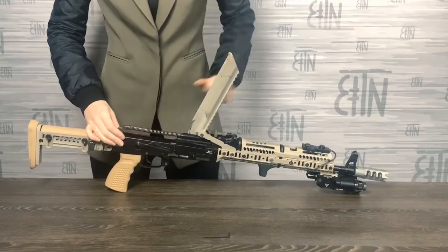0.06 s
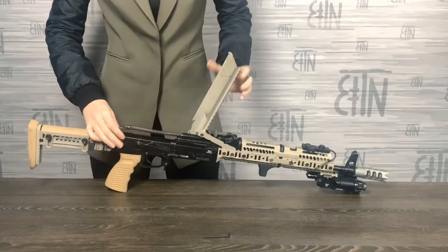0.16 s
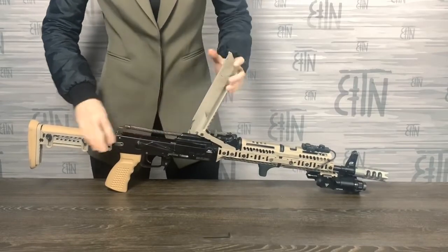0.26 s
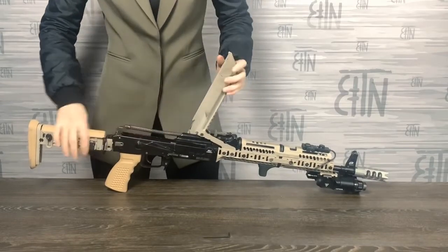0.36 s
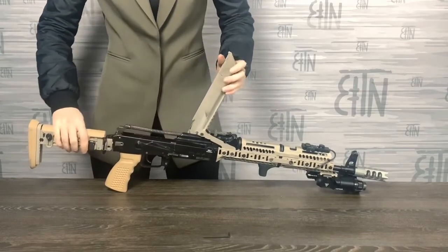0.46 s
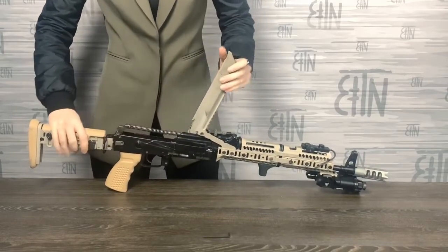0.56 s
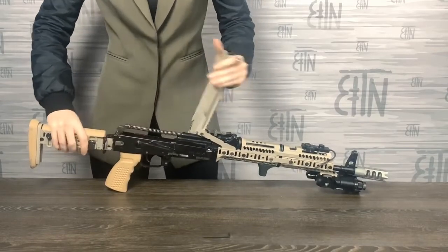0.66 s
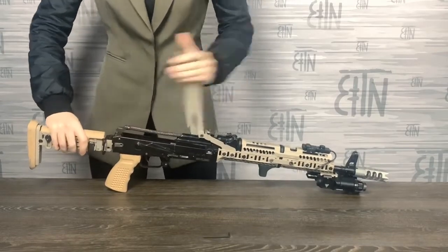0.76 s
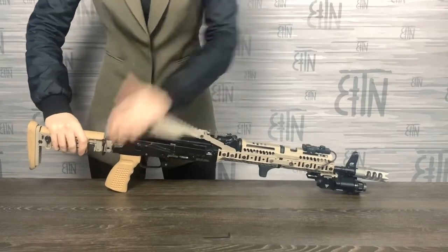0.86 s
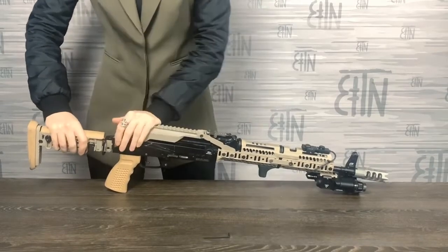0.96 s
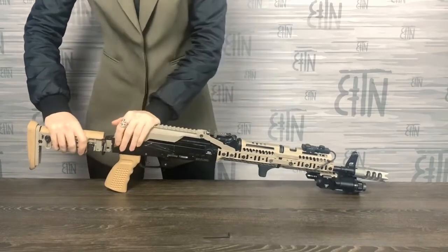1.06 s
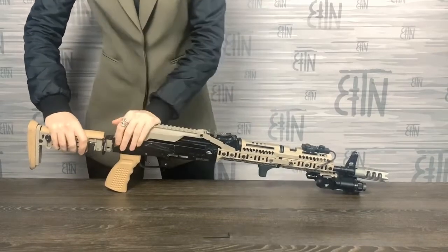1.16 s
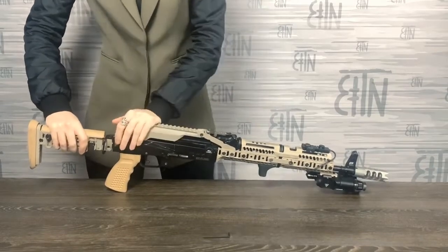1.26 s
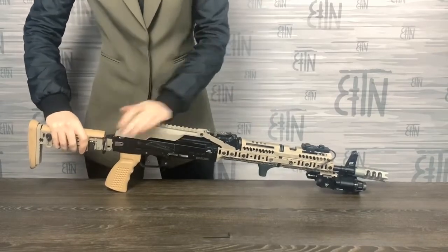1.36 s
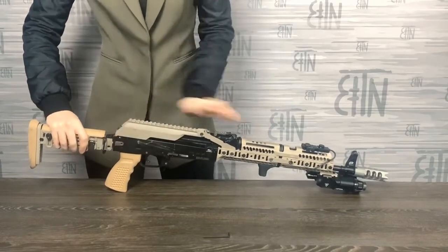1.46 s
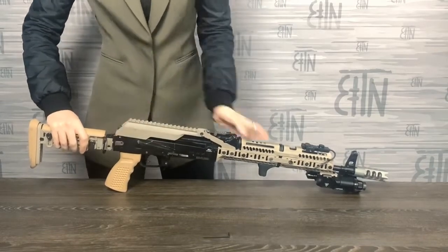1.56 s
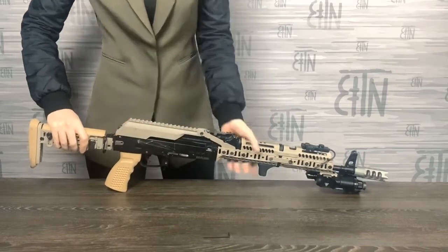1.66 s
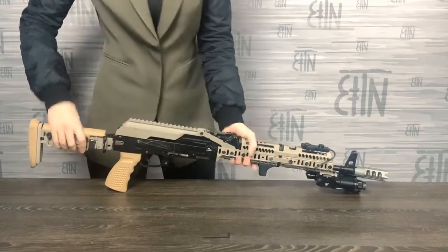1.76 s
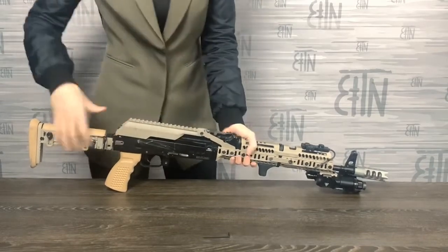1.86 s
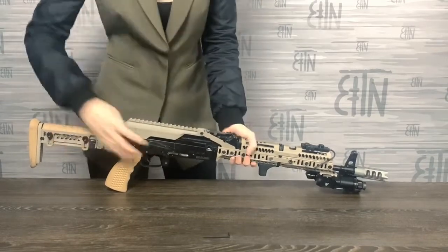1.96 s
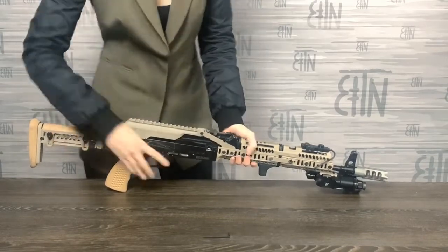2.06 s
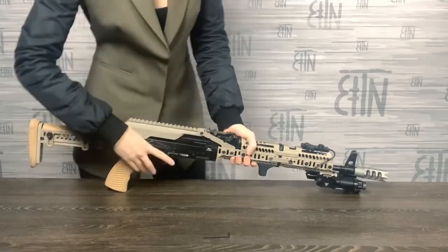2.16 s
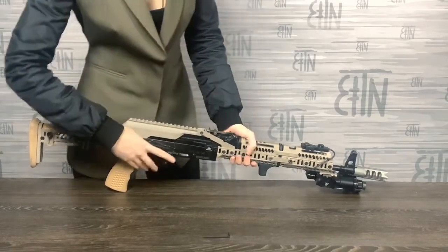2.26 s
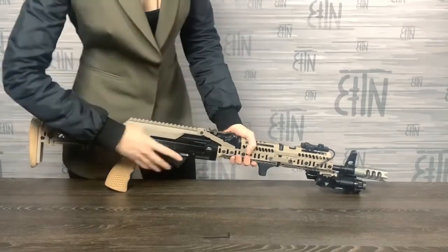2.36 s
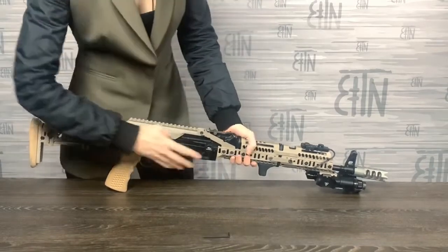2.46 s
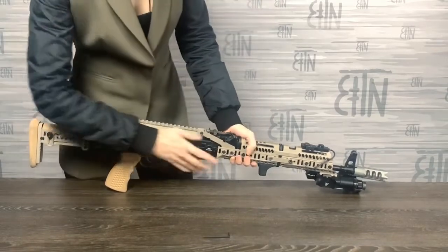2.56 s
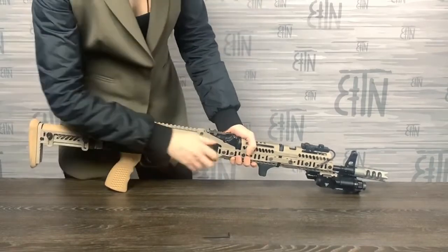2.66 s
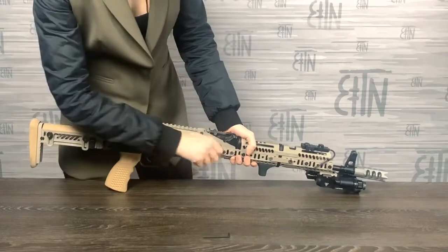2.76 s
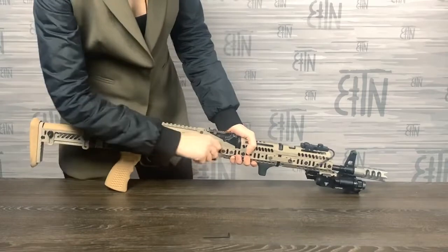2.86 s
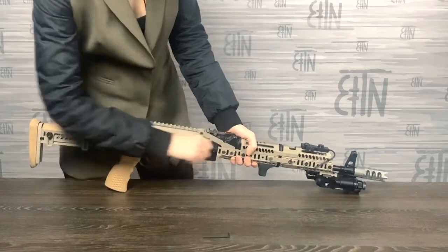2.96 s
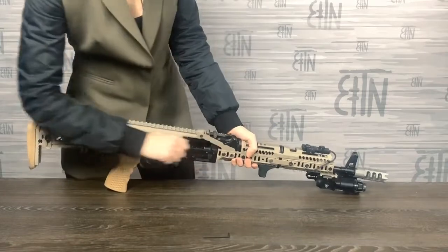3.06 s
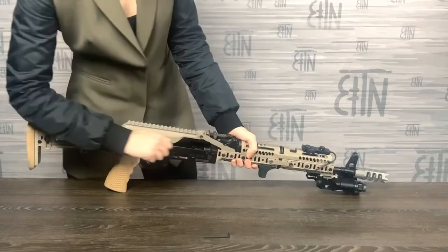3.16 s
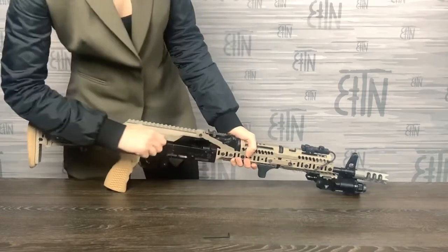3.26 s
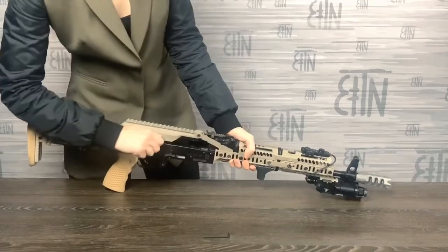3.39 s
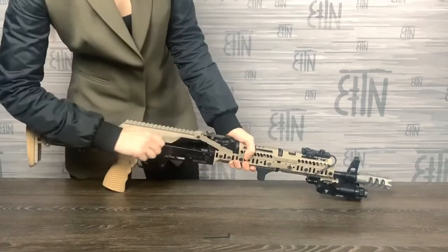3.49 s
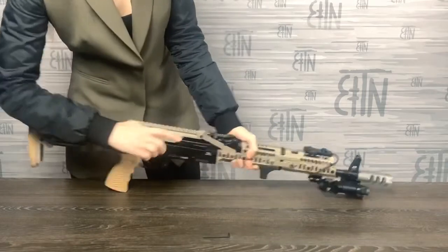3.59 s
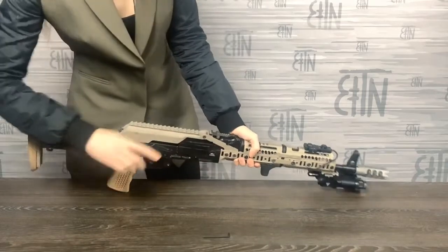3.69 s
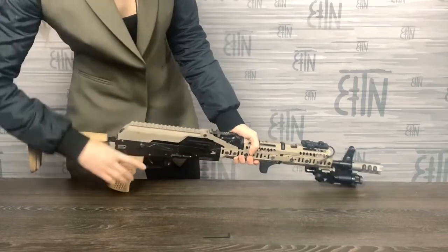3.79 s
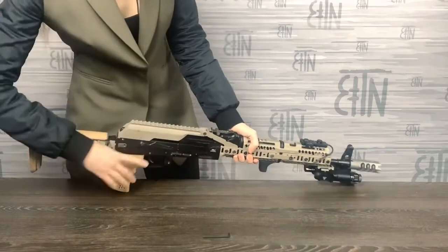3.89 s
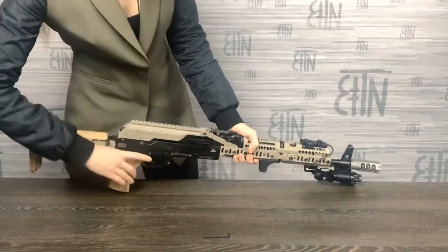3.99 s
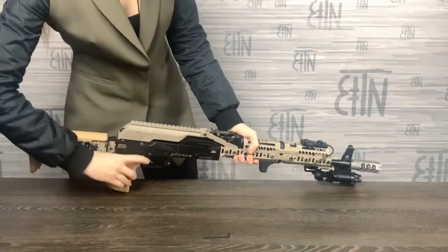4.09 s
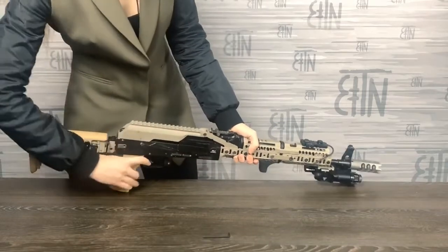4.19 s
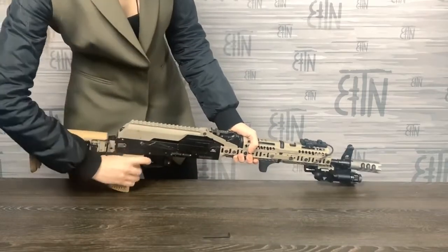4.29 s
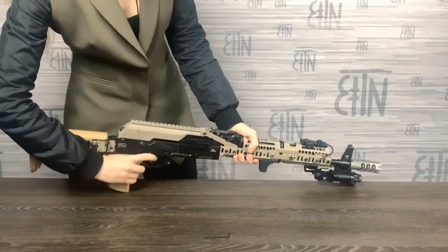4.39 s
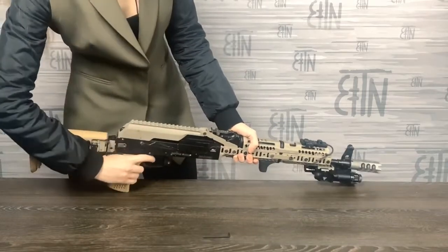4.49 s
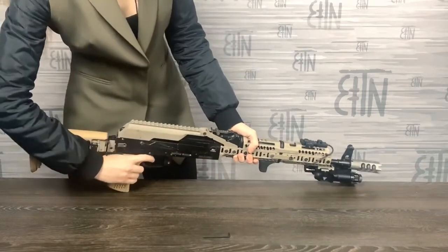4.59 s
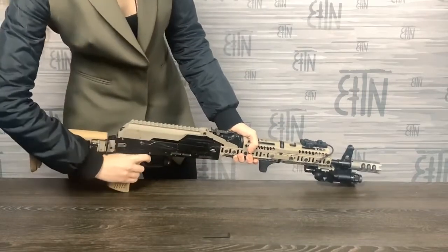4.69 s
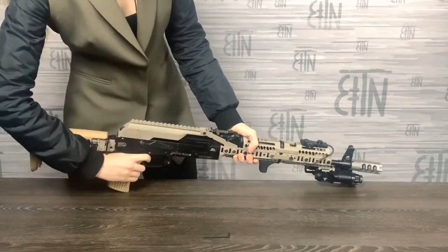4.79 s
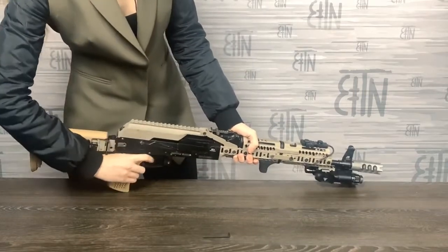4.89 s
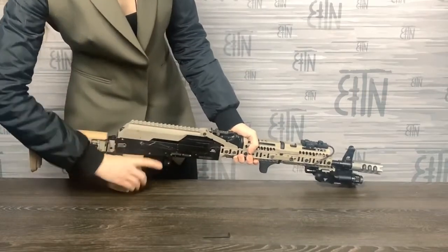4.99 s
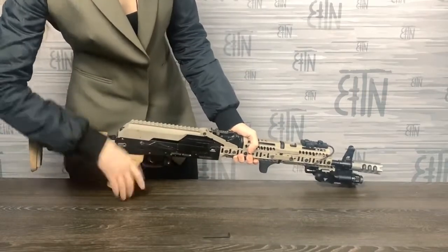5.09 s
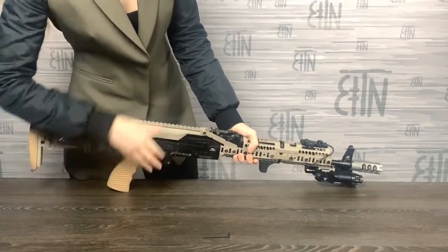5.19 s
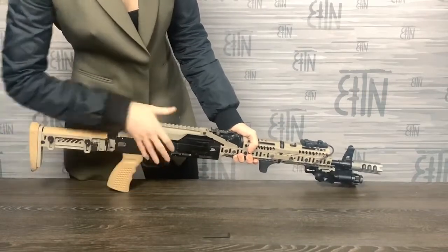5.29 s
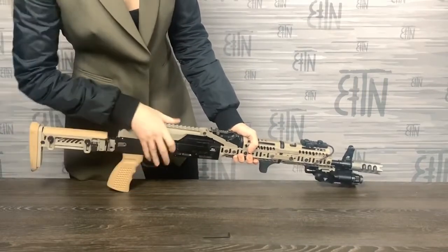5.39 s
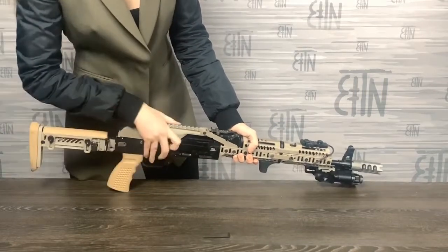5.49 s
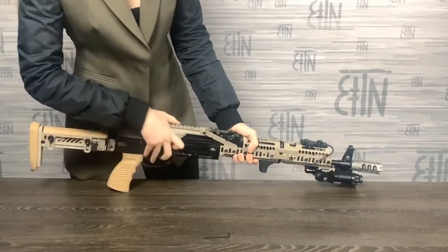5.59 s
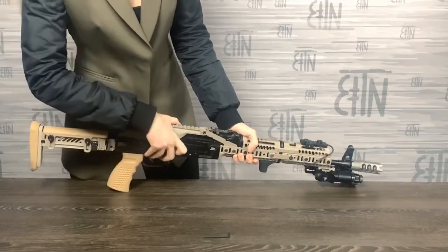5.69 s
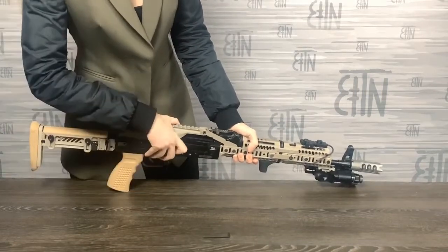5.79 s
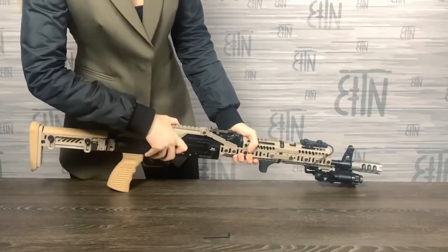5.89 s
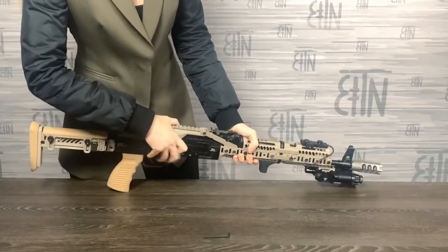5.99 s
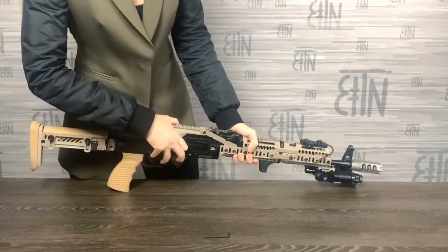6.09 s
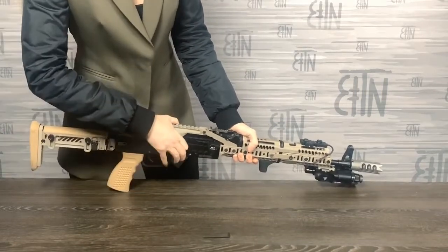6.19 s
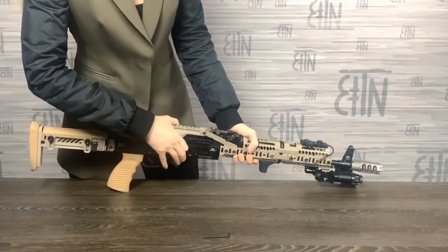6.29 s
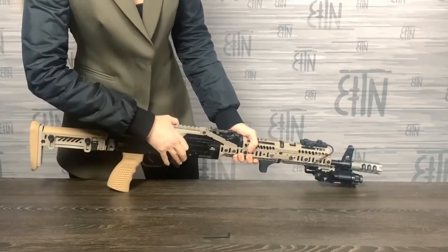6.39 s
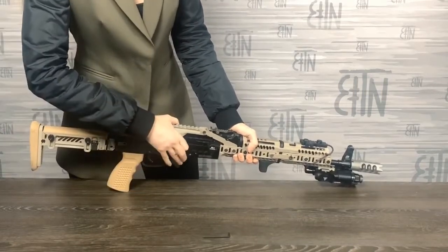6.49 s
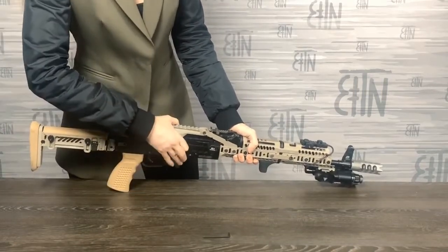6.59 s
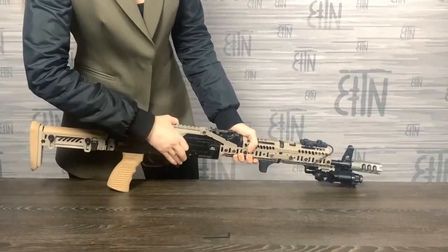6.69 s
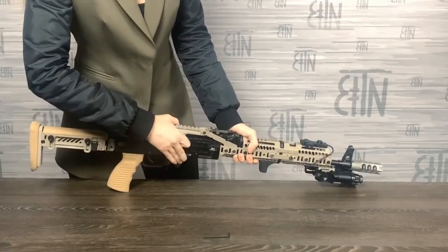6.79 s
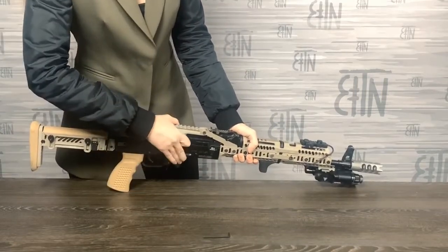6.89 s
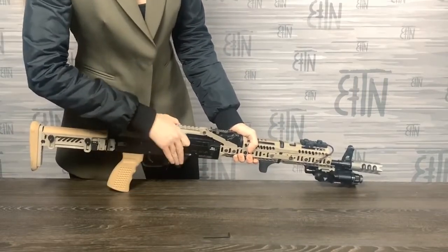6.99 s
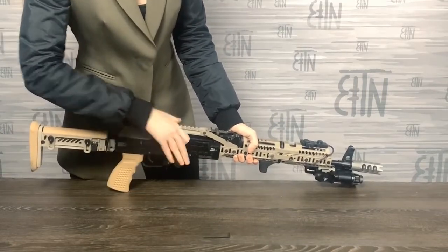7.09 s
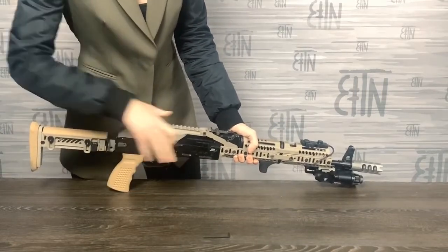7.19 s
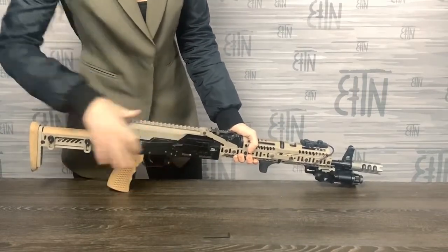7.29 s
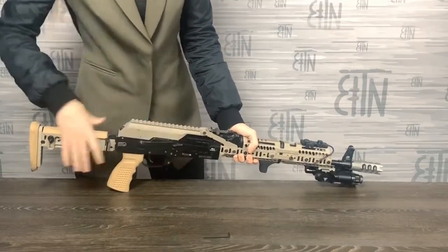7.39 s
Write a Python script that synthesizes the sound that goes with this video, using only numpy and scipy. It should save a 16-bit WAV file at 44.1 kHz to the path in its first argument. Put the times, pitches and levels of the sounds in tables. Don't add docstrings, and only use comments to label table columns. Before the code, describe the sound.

Close to the microphone in a small hard-walled room, fingers tap a thin steel cover, its hinge squeaks, and it slams shut with a ringing clank. Sleeves rustle, then the bolt ratchets back and crashes home very loudly, overloading the input. The hammer falls with a sharp crack, the trigger clicks faintly, and after light touches a lever snaps and rings.

```python
import sys
import numpy as np
from scipy import signal
from scipy.fft import rfft, irfft
from scipy.io import wavfile
from scipy.ndimage import uniform_filter1d

SR = 44100
rng = np.random.default_rng(int(sys.argv[2]) if len(sys.argv) > 2 else 0)


def persist_wave(psi):
    counts = np.round(np.clip(psi, -1, 1) * 32767).astype(np.int16)
    wavfile.write(sys.argv[1], SR, np.atleast_2d(counts).T)


def voltage_ratio(decibels):
    exponent = np.asarray(decibels, float) / 20
    return 10 ** exponent


N = 328545

# hz, level_db (per Hz)
PULL_CRACK = [(60, 3), (346, 1), (564, -12.5), (1540, -5.5), (3030, -7), (4950, -8.5), (12900, -21),
              (15900, -25)]
# hz, level_db (per Hz)
HAMMER_CRACK = [(60, -26), (315, -9.5), (1770, -8.5), (2760, -7), (5060, -6), (7530, -9.5), (12900, -11),
                (15900, -18.5)]
# hz, level_db (per Hz)
TICK_CRACK = [(60, -2.5), (600, -5), (1500, 5.5), (3000, 4.5), (6500, -3), (10000, -15), (16000, -20)]


def amp_curve(table, column, off_db=-120.):
    rows = np.array(table, float)
    return voltage_ratio(np.interp(np.arange(N) / SR, rows[:, 0], rows[:, column], off_db, off_db))


def unit(x):
    return x / np.sqrt(np.mean(x ** 2) + 1e-30)


def colour(x, shape):
    size = 4096
    hz, db = np.transpose(shape)
    log_hz = np.log(np.fft.rfftfreq(size, 1 / SR) + 1)
    log_gain = np.interp(log_hz, np.log(hz), db) * np.log(10) / 20
    cepstrum = irfft(log_gain)
    cepstrum[1:size // 2] *= 2
    cepstrum[size // 2 + 1:] = 0
    return signal.fftconvolve(x, irfft(np.exp(rfft(cepstrum))))[:len(x)]


def band(x, lo_hz, hi_hz):
    edges = [lo_hz, min(hi_hz, .45 * SR)]
    return signal.sosfilt(signal.butter(2, edges, "band", fs=SR, output="sos"), x)


def grit(scatter_db, rate):
    hold = int(SR / rate)
    sizes = voltage_ratio(scatter_db * rng.exponential(size=N // hold + 1))
    outline = uniform_filter1d(np.repeat(sizes, hold)[:N], hold)
    return unit(rng.standard_normal(N) * outline)


def strokes(rows, rise_db_s, fall_db_s):
    t = np.arange(0, N + SR // 500, SR // 500) / SR
    gain = 0
    for s, held, db in rows:
        before, after = np.maximum(s - t, 0), np.maximum(t - s - held, 0)
        gain = gain + voltage_ratio(db - rise_db_s * before - fall_db_s * after)
    return np.interp(np.arange(N) / SR, t, gain)


def ringing(modes, t, glide=0.):
    pitch_scatter, level_scatter_db, longest_t60_s = .002, 2.5, 0.46
    hz, db, t60 = (c[:, None] for c in np.transpose(modes))
    chance = rng.standard_normal((len(hz), 2))
    fade = np.exp(-np.log(1000) * t / np.clip(t60, .01, longest_t60_s))
    fade = fade * (1 - (t / t[-1]) ** 4)
    turns = hz * (1 + pitch_scatter * chance[:, 1:]) * t * (1 + glide * t / 2)
    level = voltage_ratio(db + level_scatter_db * chance[:, :1])
    ring = np.sum(level * fade * np.sin(2 * np.pi * turns), axis=0)
    return ring / np.abs(ring).max()


def room_air():
    # hz, level_db (per Hz)
    air_colour = [(15, -33), (25, 4), (64, -9.5), (84, 2), (189, -24), (350, -20.5), (8310, -43),
                  (15900, -47.5)]
    return voltage_ratio(-56.5) * unit(colour(rng.standard_normal(N), air_colour))


def room(x):
    # hz, t60_s, strength_db
    wall_decay = [(60, .6, -2), (600, .55, -1.5), (1500, .55, 0.1), (3000, .52, 0.1), (6000, .42, 0.1),
                  (9000, .33, 0.1), (12000, .28, 1), (16000, .24, 2)]
    first_wall_s, level_db = 0.0054, -35.5
    t = np.arange(SR) / SR
    hz, t60, strength_db = np.transpose(wall_decay)
    echo = 0
    for centre in 40 * 2 ** np.arange(0, 8.7, .5):
        decay_s = np.interp(np.log(centre), np.log(hz), t60)
        strength = voltage_ratio(np.interp(np.log(centre), np.log(hz), strength_db))
        noise = band(rng.standard_normal(SR), centre / 2 ** .25, centre * 2 ** .25)
        echo = echo + strength * np.exp(-np.log(1000) * t / decay_s) * noise
    spectrum = rfft(echo)
    fine, coarse = (uniform_filter1d(np.abs(spectrum) ** 2, size=width) for width in (90, 700))
    echo = irfft(spectrum * np.sqrt(coarse / (fine + 1e-12)))
    echo = echo * np.clip(t / first_wall_s - .5, 0, 1) * np.clip(8 - 10 * t, 0, 1)
    return voltage_ratio(level_db) * signal.fftconvolve(x, echo)[:N]


def table():
    # start_s, sway_db, boom_db
    jolts = [
        (0.291, -49.5, -45.5),
        (0.899, -37.5, -25),
        (1.219, -43.5, -61.5),
        (2.999, -54, -37.5),
        (3.216, -45, -29.5),
        (3.599, -23.5, -23.5),
        (4.336, -48.5, -48.5),
        (4.688, -46.5, -29),
        (4.767, -76.5, -36),
        (6.812, -53, -25),
    ]
    # hz, level_db, t60_s
    board_modes = [(95.3, -1, 0.45), (110.7, 0.5, 1)]
    legs = strokes([(s, 0, db) for s, db, _ in jolts], 1500, 44) + voltage_ratio(-61.5)
    board = strokes([(s, 0, db) for s, _, db in jolts], 1500, 91.5) + voltage_ratio(-60)
    sway = unit(band(rng.standard_normal(N), 19, 40)) * legs
    boom = unit(band(rng.standard_normal(N), 33, 110)) * board
    ring, t = np.zeros(N + SR), np.arange(SR // 2) / SR
    for s, _, db in jolts:
        i = int(s * SR)
        ring[i:i + len(t)] += voltage_ratio(db + 7.5) * ringing(board_modes, t)
    return sway + boom + ring[:N]


def sleeves_and_palms():
    # time_s, level_db
    arm_motion = [(0.0, -63.5), (.3, -70.5), (.7, -64.5), (.87, -57), (1.57, -58.5), (1.97, -68),
                  (2.8, -65.5), (4.05, -62), (4.64, -81), (5.05, -62), (5.2, -67), (5.8, -67), (5.92, -95),
                  (6.06, -72), (6.72, -99.5), (7.15, -65), (7.45, -61)]
    # start_s, held_s, level_db
    palms = [
        (.3, 0.044, -61),
        (1.57, 0.015, -64),
        (2.0, 0.038, -53),
        (5.05, 0.018, -54.5),
        (5.52, 0.021, -57.5),
        (5.74, 0.051, -67.5),
        (6.05, 0.044, -65),
    ]
    # start_s, held_s, level_db
    brushes = [
        (2.01, 0.11, -64.5),
        (4.31, 0.018, -64.5),
    ]
    # hz, level_db
    cloth = [(700, -24), (1400, 1.5), (4000, -4.5), (9000, -14), (16000, -27)]
    arms = amp_curve(arm_motion, 1)
    dull = unit(band(grit(scatter_db=2.5, rate=28), 110, 680))
    crisp = unit(colour(grit(scatter_db=1.36, rate=1100), cloth))
    dull_gain = voltage_ratio(-0.5) * arms + strokes(palms, rise_db_s=800, fall_db_s=110)
    crisp_gain = arms + strokes(brushes, rise_db_s=400, fall_db_s=62.5)
    return dull * dull_gain + crisp * crisp_gain


def spring():
    # time_s, level_db
    swell = [
        (4.1, -81),
        (4.17, -66),
        (4.37, -67.5),
        (4.5, -69.5),
        (4.68, -59.5),
    ]
    return amp_curve(swell, 1) * np.sin(2 * np.pi * 3457 * np.arange(N) / SR)


def after_rings():
    # start_s, pitch_hz, level_db, t60_s
    lone_modes = [(3.6, 336, -27, .45), (3.62, 790, -27, .4), (4.697, 343, -21, .3), (4.697, 388, -23, .25),
                  (4.70, 290, -28, .35), (4.70, 540, -29, .35), (4.76, 2250, -31, .45), (6.8, 958, -31, .5),
                  (6.81, 2661, -27, .4), (.9, 2686, -19, .4), (5.6, 2170, -69, .6)]
    out, t = np.zeros(N + SR), np.arange(SR) / SR
    for s, hz, db, t60 in lone_modes:
        throb_db = 5 * np.sin(2 * np.pi * 19 * t * (1 + t) + hz)
        level = voltage_ratio(db + throb_db - 60 * t / t60) * (1 - np.exp(-t / .008))
        i = int(s * SR)
        out[i:i + SR] += level * np.sin(2 * np.pi * hz * t)
    return out[:N]


def rub(rows, sing, hiss_db):
    push = grit(scatter_db=2.5, rate=900)
    tones = sum(voltage_ratio(db) * unit(band(push, hz - width / 2, hz + width / 2)) for hz, width, db in sing)
    hiss = voltage_ratio(hiss_db) * unit(band(push, 1900, 22000))
    return (unit(tones) + hiss) * strokes(rows, rise_db_s=600, fall_db_s=500)


def hinge_rub():
    # start_s, held_s, level_db
    turns = [
        (.49, .16, -60),
        (.705, 0.02, -66),
    ]
    # hz, width_hz, level_db
    sing = [(2140, 40, 1), (1960, 200, -7), (3040, 35, -7), (4250, 70, -8.5), (5700, 60, -9.5),
            (7000, 300, -8.5), (7400, 70, -4.5), (7800, 250, -6.5), (8310, 70, -10), (8950, 60, -11.5),
            (10500, 50, -12), (12900, 120, -9), (15000, 60, -17.5)]
    return rub(turns, sing, hiss_db=-5.0)


def rail_rub():
    # start_s, held_s, level_db
    slides = [
        (2.66, 0.042, -58),
        (3.515, 0.02, -51.5),
    ]
    # hz, width_hz, level_db
    sing = [(2000, 1500, -4), (3600, 1500, -2), (5600, 2500, 0)]
    return rub(slides, sing, hiss_db=-3.5)


def pin():
    # start_s, peak_db
    knocks = [(2.931, -11), (2.934, -12), (2.946, -8), (2.960, -8), (2.968, -15), (2.996, -25.5),
              (3.150, -33), (3.163, -35.5), (3.217, -21.5), (3.235, -23.5), (3.51, -37), (4.69, -1),
              (4.699, -10), (4.714, -15), (4.743, -25)]
    # hz, level_db, t60_s
    pin_modes = [(12500, -1.5, 0.055), (12540, -5, 0.05), (13600, -17, .03)]
    out, t = np.zeros(N + SR), np.arange(SR // 4) / SR
    for s, db in knocks:
        i = int(s * SR)
        out[i:i + len(t)] += voltage_ratio(db) * ringing(pin_modes, t) * np.minimum(t / 0.00053, 1)
    return out[:N]


def chatter(length, rise, size=4096):
    t = np.arange(size) / SR
    outline = np.exp(-t / length) * (1 - np.exp(-t / (rise * length)))
    direct = force = rng.standard_normal(size) * outline
    for _ in range(4):
        spectrum = rfft(force)
        force = irfft(spectrum / (np.abs(spectrum) + 1e-12))
        force = force * outline / np.sqrt(uniform_filter1d(force ** 2, size=24) + 1e-14)
    return np.pad([direct, force], ((0, 0), (0, size)))


def blows(events, modes, crack, gain_db, thud_db, ring_db, rise, own_db=-4, glide=0.):
    out, t = np.zeros((3, N + SR)), np.arange(SR // 2) / SR
    own_width = 0.051
    click = colour(signal.unit_impulse(SR // 5), crack)
    bands = [band(click, 56, 330), band(click, 510, 6900), band(click, 7600, 20000)]
    for s, db, bright_db, ms, hz in events:
        contact = chatter(max(ms, .3) / 1000, rise)
        ring = signal.fftconvolve(ringing(modes, t, glide), contact[1])[:len(t)]
        parts = [signal.fftconvolve(contact, b[None], axes=1)[:, :contact.shape[1]] for b in bands]
        parts += [band(contact[1], (1 - own_width) * hz, (1 + own_width) * hz), ring]
        gains = voltage_ratio(db + gain_db + np.array([thud_db, 0, bright_db, own_db, ring_db]))
        parts = [g * p / np.abs(p).max(axis=-1, keepdims=True) for g, p in zip(gains, parts)]
        low, mid, high, own, ring = parts
        i = int(s * SR)
        out[:2, i:i + len(own)] += mid - low - high
        out[2, i:i + len(own)] += own
        out[2, i:i + len(t)] += ring
    return out[:, :N]


def finger_ticks():
    # start_s, peak_db, brightness_db, contact_ms, loudest_hz
    ticks = [
        (1.742, -34, 5, 1.3, 3227),
        (2.0, -63.5, -11.5, 4.3, 1280),
        (2.03, -41, -29, 9.5, 684.4),
        (5.339, -50.5, -14, 4.5, 2542),
        (6.012, -47, -5, 8.8, 4540),
        (6.143, -48, -5, 4.1, 1410),
        (6.275, -49.5, -14.5, 2.4, 4416),
        (6.339, -57, -20, 3.14, 4430),
        (6.466, -53.5, -2, 2.25, 4400),
    ]
    # start_s, peak_db, brightness_db, contact_ms, loudest_hz
    nudges = [
        (5.453, -48, -21, 17, 1603),
        (5.517, -39, -13, 6.2, 1038),
        (5.545, -51.5, -4.5, 6.8, 2110),
    ]
    # hz, level_db, t60_s
    loose_parts = [(985, 5, 0.13), (1600, -10, 0.074), (2230, -18, 0.32), (2230, -18, .3)]
    return (blows(nudges, loose_parts, TICK_CRACK, -1.6, thud_db=-2.5, ring_db=-3.5, rise=0.56)
            + blows(ticks, loose_parts, TICK_CRACK, -1.9, thud_db=-24, ring_db=-18.0, rise=0.12))


def cover_taps():
    # start_s, peak_db, brightness_db, contact_ms, loudest_hz
    taps = [
        (.2665, -17, -9, 2.8, 7845),
        (.3845, -25.5, -21.5, 1.8, 1986),
    ]
    # hz, level_db, t60_s
    sheet = [(1125, -22, .2), (1938, -13, .4), (2010, -14, .08), (2095, -3, .5), (2401, -11, .18),
             (2810, -9, .2), (3036, 2, .52), (3500, -17, .1), (4300, -20, .12), (4613, -18, .2),
             (7090, -17, .18), (7445, -18, .18), (8290, -18, .22), (10530, -26, .08)]
    edge = [(1072, -6, 0.24), (1860, -6, .2), (1950, -2.5, 0.33), (2050, -5, 0.48), (2870, -8.5, .3),
            (3914, -10, .1), (4340, -7.5, .1)]
    # hz, level_db (per Hz)
    sheet_crack = [(60, -11.5), (1300, -20.5), (1900, 4.5), (2570, -6.5), (3030, -9), (4500, -14.5),
                   (8070, -22), (15900, -41)]
    edge_crack = [(60, -8.5), (700, -9.5), (1900, 1.5), (3800, -4), (4600, -16), (15900, -40.5)]
    return (blows(taps[:1], sheet, sheet_crack, -9.0, thud_db=-22.5, ring_db=-3.03, rise=0.045)
            + blows(taps[1:], edge, edge_crack, -6.5, thud_db=-20.5, ring_db=-9.5, rise=.1))


def hinge_creaks():
    # start_s, peak_db, brightness_db, contact_ms, loudest_hz
    creaks = [
        (.7485, -23, 2, 3.9, 7400),
        (.766, -27, -4.5, 4.5, 7980),
        (.785, -32.5, -7, 8.9, 2969),
        (.8072, -29.5, -12, 4.8, 4440),
        (.818, -29, -7, 6, 3111),
        (.826, -30, -7.5, 5, 5017),
        (.866, -30, -14.5, 5.2, 2645),
    ]
    # hz, level_db, t60_s
    swing = [(2700, -6, .05), (3800, 0, 0.046), (4400, -5.5, .05), (4900, -4, .05), (5600, -7.5, .05),
             (6350, -3, .045), (11500, -12, .03), (7400, -2.5, .045)]
    # hz, level_db (per Hz)
    creak_crack = [(35, -28.5), (60, 3), (133, -5), (168, -18), (346, -17), (1140, -31), (4950, -4),
                   (15900, -15)]
    return blows(creaks, swing, creak_crack, -12, thud_db=-13, ring_db=4.5, rise=0.4, own_db=0, glide=1.6)


def cover_slam():
    # start_s, peak_db, brightness_db, contact_ms, loudest_hz
    slam = [
        (0.881, 1.5, -6.5, 12.7, 1308),
        (0.885, 4.4, -9.5, 12.4, 2022),
        (0.892, 0.8, -5.5, 6.7, 4900),
        (0.907, 1.4, -17, 3.4, 2660),
        (0.921, 1.2, -13, 9.1, 2200),
    ]
    # hz, level_db, t60_s
    shut = [(1093, -5.5, .08), (1308, -1.5, 0.092), (1620, -7, .1), (1726, -5, 0.059), (1977, -3, 0.045),
            (2080, 0.5, 0.24), (2010, -4, 0.14), (2180, -5, .1), (2236, -4, .1), (2720, 0, 0.099),
            (2620, -3.5, 0.05), (3063, -7, 0.11)]
    # hz, level_db (per Hz)
    slam_crack = [(60, -11.5), (468, -9.5), (1200, -5), (1690, -5), (2090, -0.5), (2890, -4), (6700, -11),
                  (15900, -22.5)]
    return blows(slam, shut, slam_crack, 3.5, thud_db=-16.5, ring_db=-6.5, rise=0.02, own_db=-7.0)


def latch():
    # start_s, peak_db, brightness_db, contact_ms, loudest_hz
    clicks = [
        (2.8333, -13, -7, 2.5, 4800),
        (2.8595, -13.5, -13, 2.4, 4695),
        (2.866, -21.5, -11, 3.4, 4500),
    ]
    # hz, level_db, t60_s
    latch_modes = [(216, 0.5, .1), (399.1, -4.5, 0.31), (1080, -4, 0.13), (2168, 2, 0.059),
                   (4700, -7.5, 0.089), (4800, -3.5, 0.1), (4870, -2, 0.08), (10620, -10.5, 0.064)]
    return blows(clicks, latch_modes, PULL_CRACK, -1.4, thud_db=-14, ring_db=-5.0, rise=0.098)


def bolt_ratchet():
    # start_s, peak_db, brightness_db, contact_ms, loudest_hz
    clicks = [(2.9295, -12, -5.5, 2, 5160), (2.959, -17, -5, 2.5, 1250), (2.9865, -8.5, 1, 1.5, 8660),
              (2.990, -9, -9.5, 3.4, 2270), (3.006, -9, -5, 3.7, 2270), (3.048, -12.5, -14, 3, 2160),
              (3.0595, -10, -6.5, 2.5, 3547), (3.088, -19, -10, 3, 2200), (3.109, -22.5, -15, 4, 1900),
              (3.142, -7, -5, 2.2, 5030), (3.160, -20, -4, 3, 1914)]
    # start_s, peak_db, brightness_db, contact_ms, loudest_hz
    rasps = [(2.939, -9, -0.5, 2, 5460), (2.944, -9, -1.5, 2.2, 4395), (2.948, -15, -4.5, 2, 3244),
             (2.997, -17.5, -2.5, 2, 8780), (3.052, -14, -15, 5.3, 2300), (3.070, -7, -3.5, 1.6, 8460),
             (3.076, -14.5, -4, 2, 3427), (3.128, -12.5, -5.5, 1.8, 6000), (3.132, -11, -7, 2.7, 1665),
             (3.203, -29, -4.5, 1.9, 2002), (3.526, -15.5, -15, 9.2, 2179), (3.543, -11, -4, 3, 3007),
             (3.550, -3, -3, 3.3, 2102), (4.678, -17, -5, 2, 3104), (4.681, -8, -7, 1, 4946),
             (6.791, -19.5, -5.5, 1.9, 2704)]
    # hz, level_db, t60_s
    bolt = [(1180, -11, 0.049), (2170, -4, .03), (3454, -7, 0.027), (4500, -6.5, .015), (5300, -4.5, 0.013),
            (6750, -7, .02), (8600, -7, 0.027)]
    return (blows(clicks, bolt, PULL_CRACK, -6.5, thud_db=-19.5, ring_db=0.0, rise=0.038, own_db=1.5)
            + blows(rasps, bolt, PULL_CRACK, -5.0, thud_db=-26.5, ring_db=-3.0, rise=16.0, own_db=0.5))


def bolt_rear():
    # start_s, peak_db, brightness_db, contact_ms, loudest_hz
    stop = [
        (3.2145, 8, -14.5, 3, 5600),
        (3.224, -10, -11, 8.5, 1593),
        (3.236, -15, -14.5, 11, 3056),
    ]
    # hz, level_db, t60_s
    carrier = [(395, -7, .15), (441, -4, 0.22), (480, -8.5, .2), (980, -7, 0.079), (1457, -7, .08),
               (1650, -6.5, .07), (1717, -5, 0.053), (3420, -2.5, .06), (5900, -4.5, .05)]
    # hz, level_db (per Hz)
    stop_crack = [(60, 0.5), (362, 6.5), (943, -8.5), (1220, -8), (1610, -3), (5060, -12), (12600, -11),
                  (15900, -15.5)]
    return blows(stop, carrier, stop_crack, -5.5, thud_db=-21.5, ring_db=-4.5, rise=0.063)


def catch():
    # start_s, peak_db, brightness_db, contact_ms, loudest_hz
    release = [
        (3.5083, -12.5, -14, 2.2, 5210),
    ]
    # hz, level_db, t60_s
    catch_modes = [(1770, 3, 0.018), (3500, -0.5, .03), (5400, -0.5, 0.012)]
    return blows(release, catch_modes, HAMMER_CRACK, -0.79, thud_db=-23.5, ring_db=-5.5, rise=0.24)


def bolt_home():
    # start_s, peak_db, brightness_db, contact_ms, loudest_hz
    crash = [
        (3.553, 4.1, -10, 11, 5772),
        (3.559, 3.8, -10, 8, 2252),
        (3.566, 5.4, -8.5, 9.5, 2161),
        (3.572, 3.7, -11.5, 6.9, 5400),
        (3.577, 12, -7.5, 5.7, 7917),
        (3.590, 11, -11.5, 14, 2855),
        (3.602, 8.7, -12.5, 15, 1683),
        (3.612, 8, -15, 10, 1950),
        (3.625, 3, -15, 21, 920),
    ]
    # hz, level_db, t60_s
    receiver = [(331, -6, 0.45), (551, -6.5, 0.36), (785, -3, 0.25), (958, -6, .4), (965, -10, .15),
                (1657, -4.5, 0.29), (1890, -4, .15), (2200, -1.5, 0.31), (2160, -2.5, .17), (3289, -4, .12),
                (4900, -4.5, .06)]
    # hz, level_db (per Hz)
    home_crack = [(60, 0.5), (362, -1), (900, -8.5), (1330, -12), (1900, -6), (3300, -7.5), (4200, -7.5),
                  (15900, -10.5)]
    return blows(crash, receiver, home_crack, -2.0, thud_db=-21.5, ring_db=-15.0, rise=0.017, own_db=-6.5)


def hammer_and_trigger():
    # start_s, peak_db, brightness_db, contact_ms, loudest_hz
    fall = [
        (4.6865, 2.5, -2, 5, 6040),
        (4.694, 2, -5, 5.8, 1745),
        (4.709, -6, -4.5, 4, 2376),
    ]
    # start_s, peak_db, brightness_db, contact_ms, loudest_hz
    reset = [
        (4.922, -19.5, -12, 3.9, 4150),
    ]
    # hz, level_db, t60_s
    hammer = [(342, -2, .35), (379, -2, 0.53), (1033, -6.5, 0.202), (1745, -1, .06), (2220, -4.5, 0.33),
              (3270, -8, .25), (4340, -10.5, .2), (5142, -7, .08), (2540, -8.5, .2), (6112, -6, .05)]
    trigger = [(3817, -2, .2), (4050, -5, .18), (4215, 1, .12), (4400, -5, .15), (6770, -7, .15)]
    return (blows(fall, hammer, HAMMER_CRACK, -0.79, thud_db=-14.0, ring_db=-10.5, rise=0.15, own_db=-5.5)
            + blows(reset, trigger, HAMMER_CRACK, -1.4, thud_db=-9, ring_db=-10.0, rise=0.63))


def lever():
    # start_s, peak_db, brightness_db, contact_ms, loudest_hz
    tip_taps = [
        (5.714, -41.5, -4, 3.2, 1600),
        (5.790, -42, -10, 2.8, 1580),
    ]
    # start_s, peak_db, brightness_db, contact_ms, loudest_hz
    snap = [
        (6.7965, -1, -5, 3.9, 1960),
        (6.803, -11, -7, 4, 1537),
        (6.812, -5.5, -9, 4, 2653),
        (6.822, -10.5, -11.5, 11, 2300),
    ]
    # hz, level_db, t60_s
    tip = [(1000, -3, .06), (1600, -2, .06), (2150, -5, .4), (2185, -5, .45)]
    lever_modes = [(960, -8.5, .45), (1704, -5.5, .3), (1910, -6.5, 0.19), (2270, -5.5, 0.44),
                   (2440, -3, 0.27), (2660, 1.5, .4), (2715, -2, 0.8), (2960, -5, 0.27), (3200, -5.5, 0.15),
                   (3440, -5.5, 0.4), (3350, -2.5, .27), (4285, -6, 0.238)]
    # hz, level_db (per Hz)
    snap_crack = [(130, -3.5), (538, -9.5), (960, -3), (1340, -9), (2630, -3), (3830, -8.5), (8860, -14.5),
                  (15900, -24)]
    return (blows(tip_taps, tip, TICK_CRACK, -1.3, thud_db=1, ring_db=-6.5, rise=0.14)
            + blows(snap, lever_modes, snap_crack, 0.31, thud_db=-18.5, ring_db=-17.0, rise=0.16, own_db=-11.5))


def scene():
    crack, spread, tones = (finger_ticks() + cover_taps() + hinge_creaks() + cover_slam() + latch()
                            + bolt_ratchet() + bolt_rear() + catch() + bolt_home()
                            + hammer_and_trigger() + lever())
    tones = tones + hinge_rub() + after_rings() + pin()
    sliding = rail_rub()
    echo = room(spread + sliding + voltage_ratio(-8) * tones)
    handling = sleeves_and_palms() + table() + spring()
    return (crack + sliding + tones + echo + handling + room_air())[None]


def roll_off(x):
    return signal.sosfilt(signal.butter(12, 16040, fs=SR, output="sos"), x)


def record(dry):
    # start_s, end_s, residue_db, return_db, recovery_s
    dropouts = [
        (1.0331, 1.108, -30, -13.5, 0.022),
        (1.344, 1.412, -49, -5, 0.032),
        (3.5883, 3.5941, -22, -3, 0.0022),
    ]
    ceiling = .84
    t, x = np.arange(N) / SR, np.clip(dry, -ceiling, ceiling)
    for start, end, left_db, back_db, recover in dropouts:
        gap = (t >= start) & (t < end)
        residue = voltage_ratio(left_db - 1000 * (t - start) * gap)
        drain = voltage_ratio(left_db - 15.0) * np.exp(-np.abs(t - start) / .025)
        back = voltage_ratio(back_db * np.exp(-np.maximum(t - end, 0) / recover) * (t >= end))
        soft_edge = np.clip(np.abs(t - end) / (.1 * recover), 0, 1)
        x = np.where(gap, x * residue + drain, x * back * soft_edge)
    return roll_off(x)


dry = scene()
out = record(dry)
persist_wave(out)
```